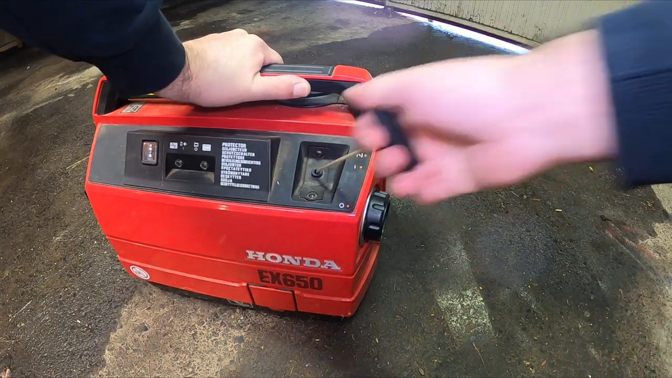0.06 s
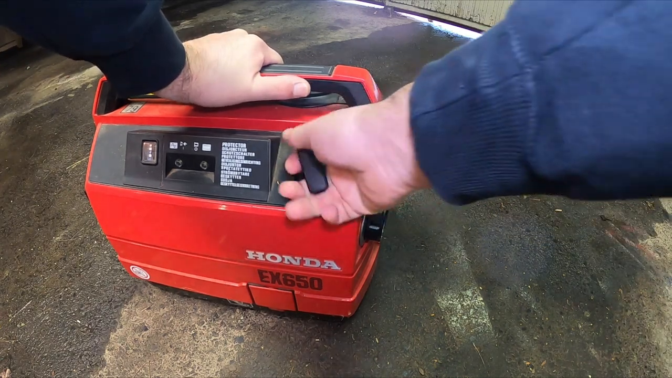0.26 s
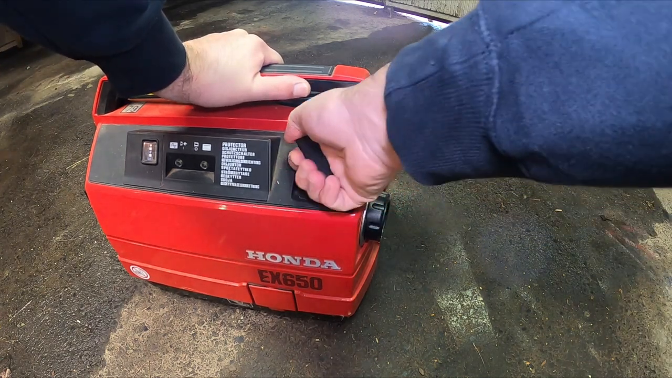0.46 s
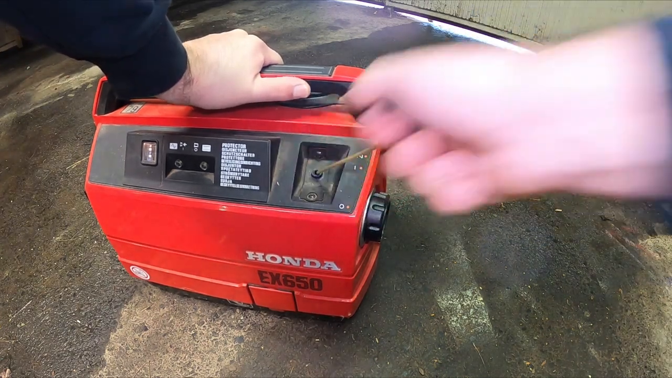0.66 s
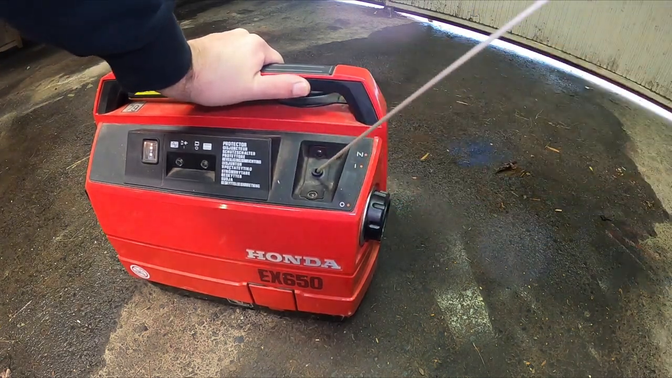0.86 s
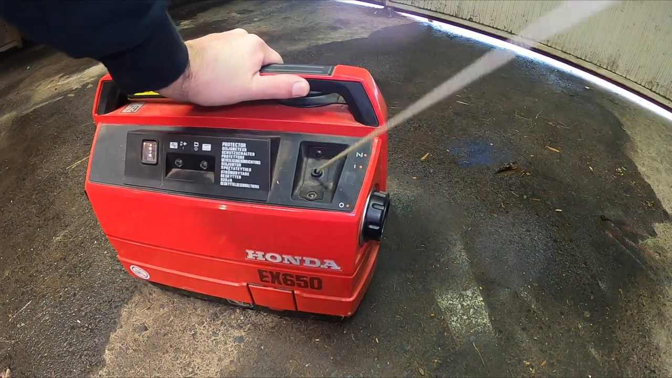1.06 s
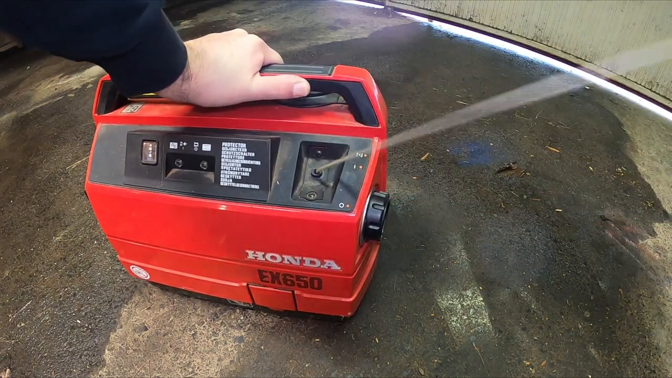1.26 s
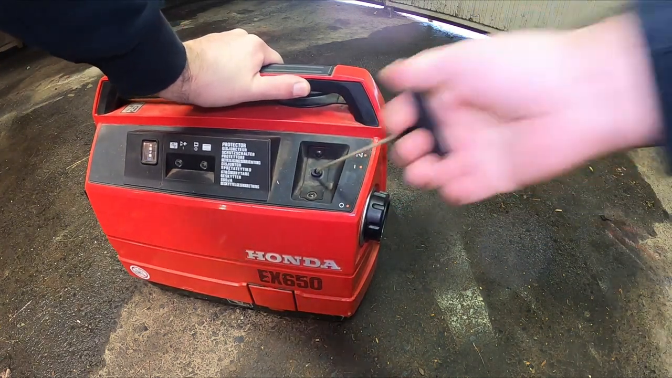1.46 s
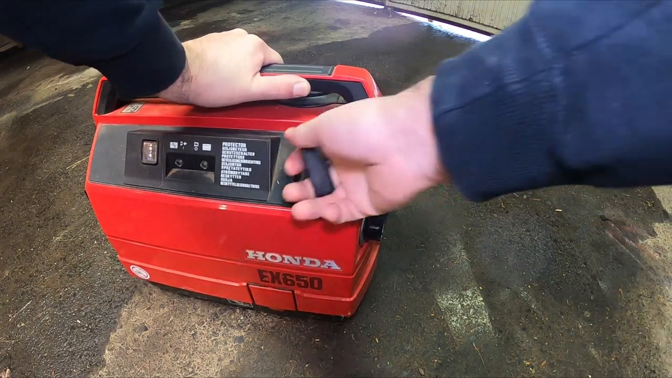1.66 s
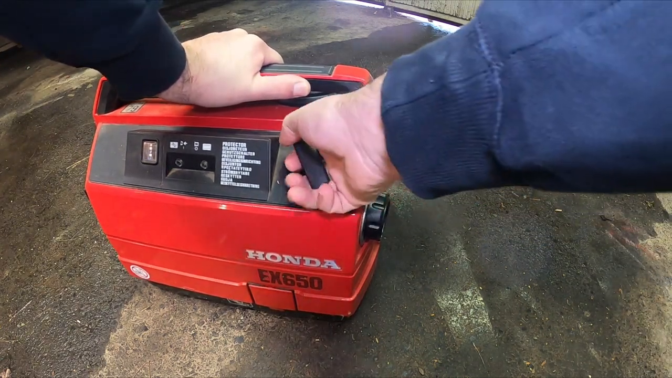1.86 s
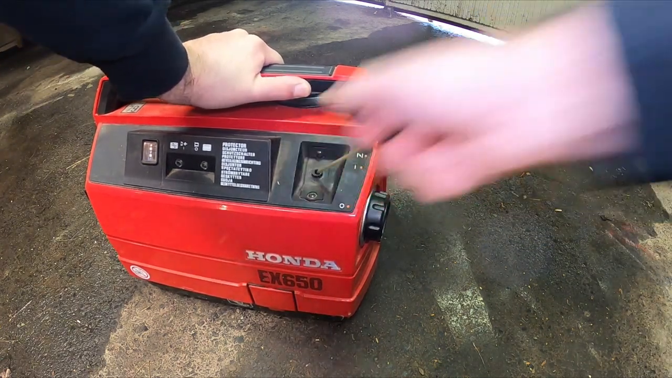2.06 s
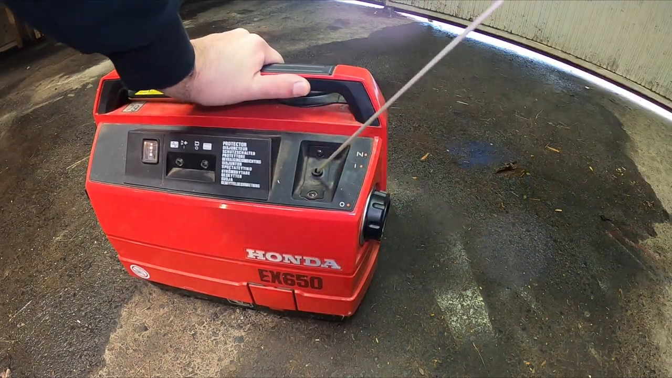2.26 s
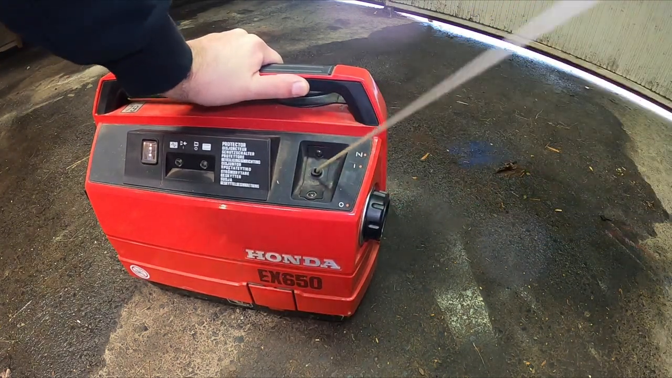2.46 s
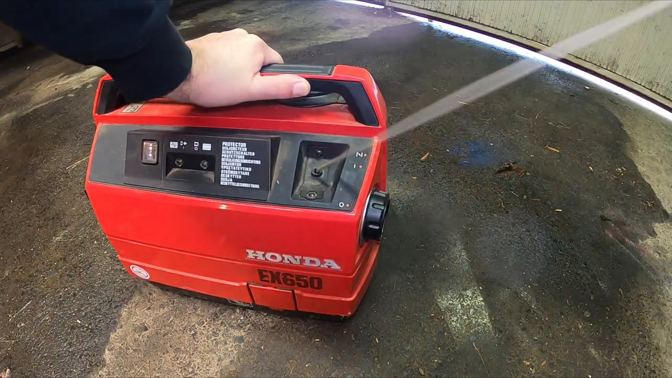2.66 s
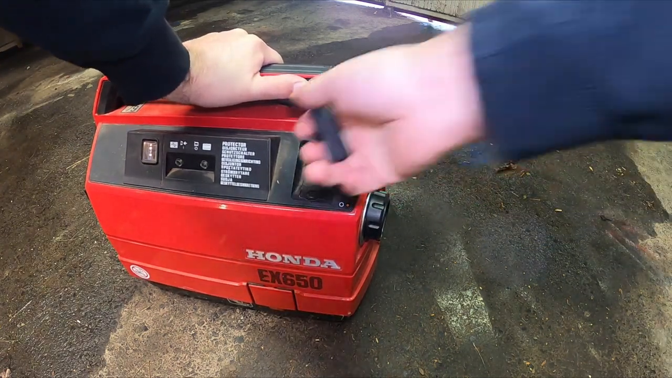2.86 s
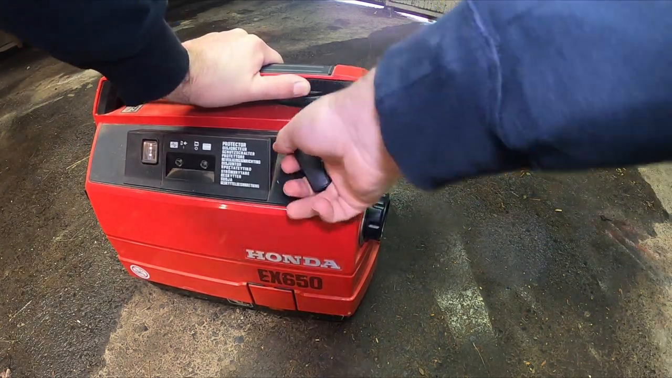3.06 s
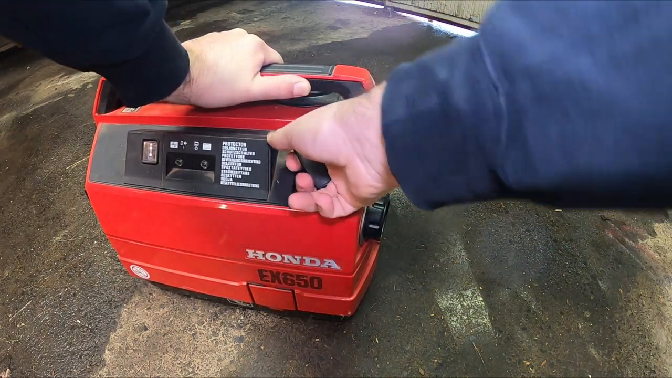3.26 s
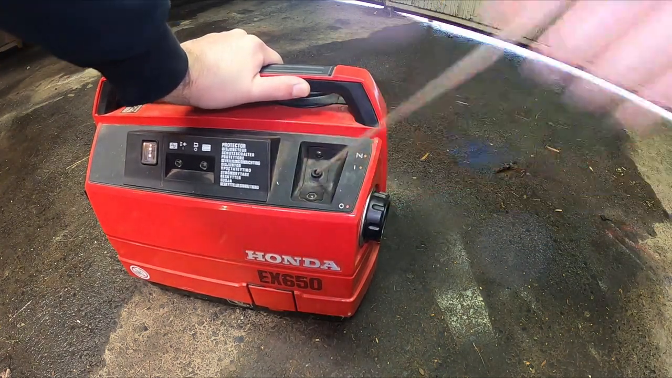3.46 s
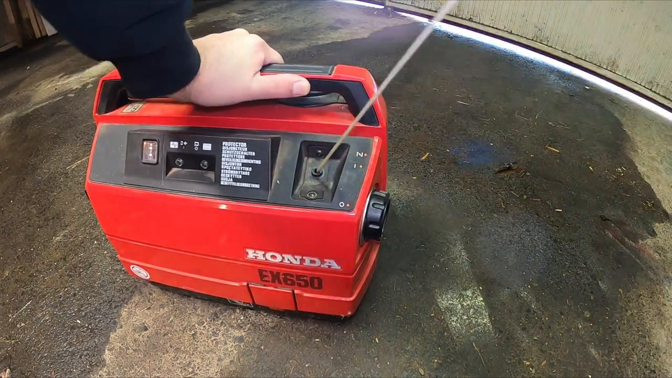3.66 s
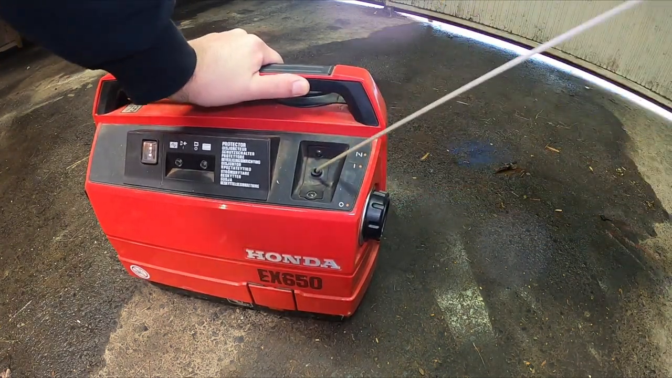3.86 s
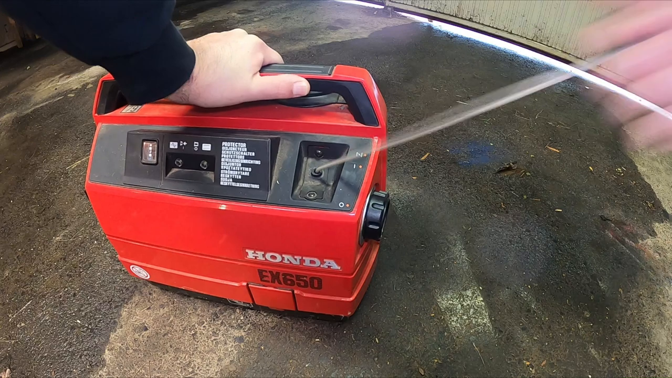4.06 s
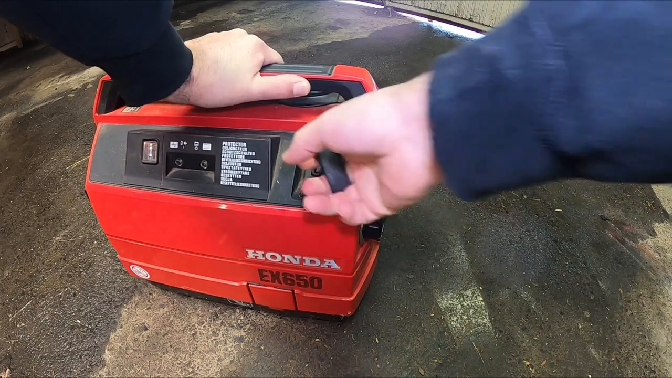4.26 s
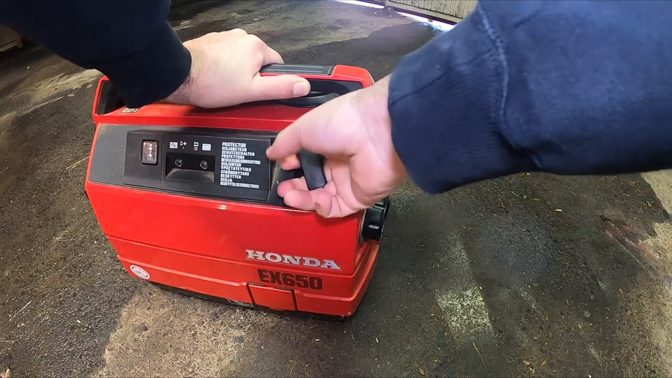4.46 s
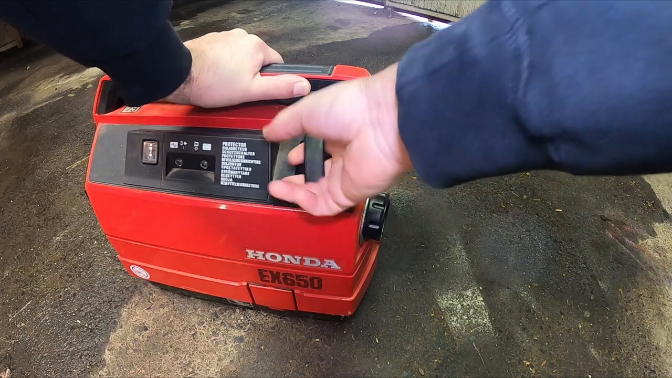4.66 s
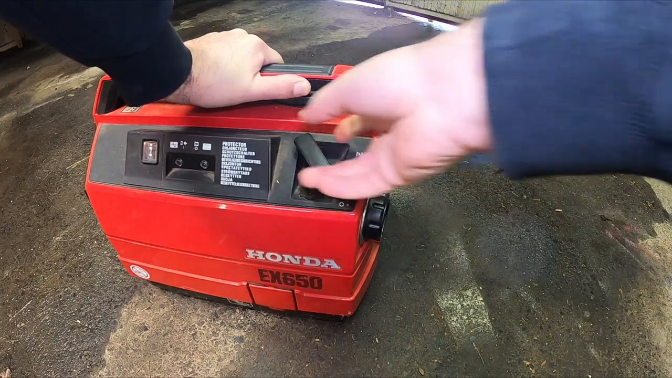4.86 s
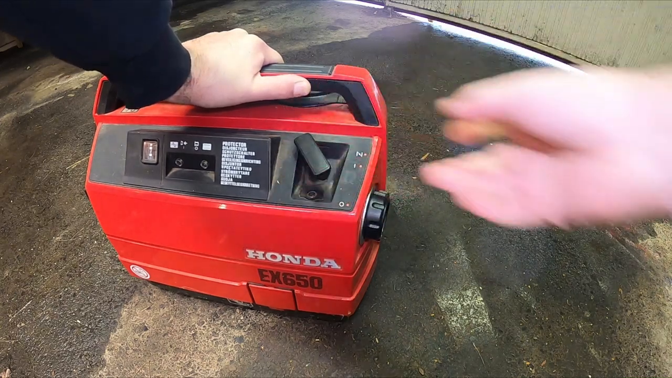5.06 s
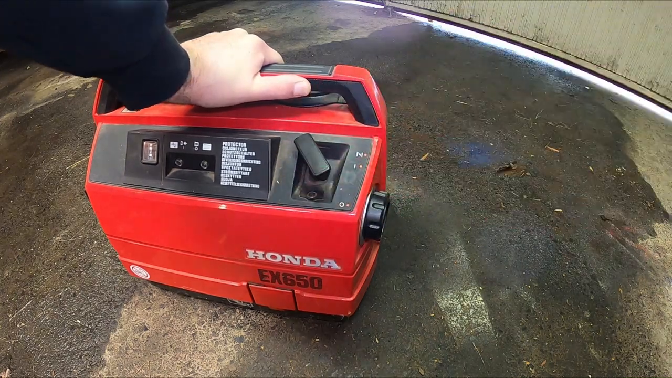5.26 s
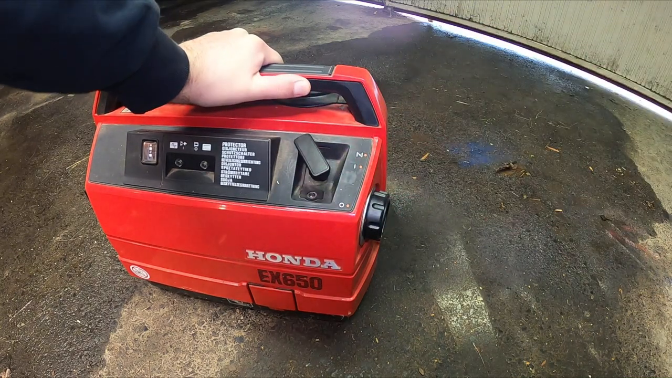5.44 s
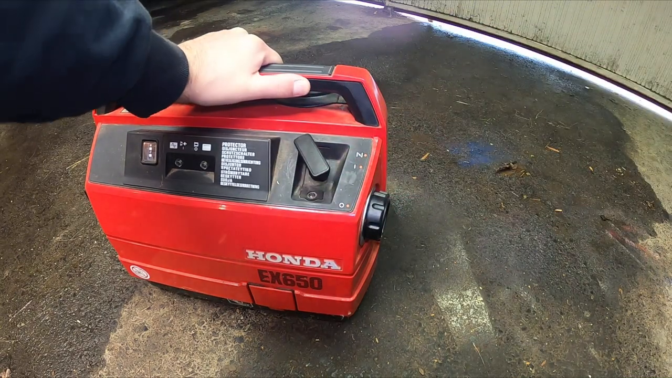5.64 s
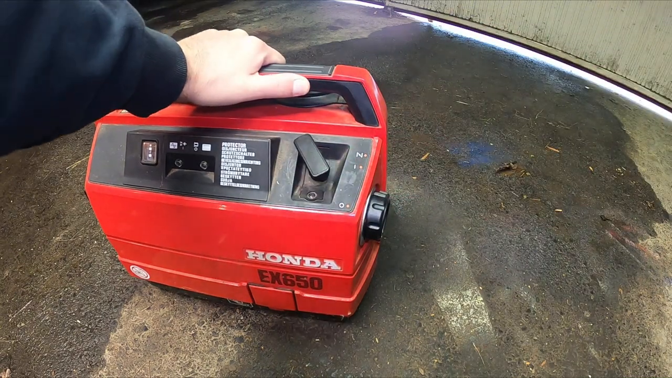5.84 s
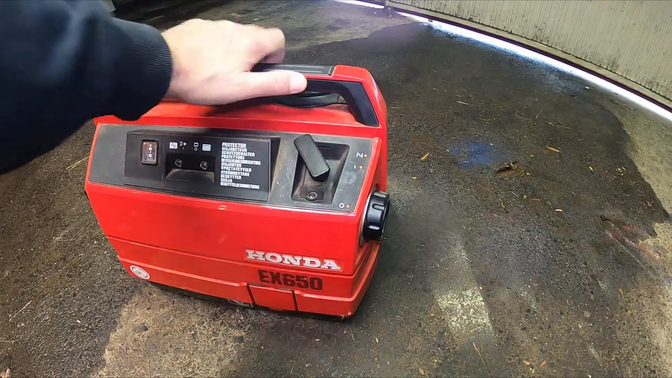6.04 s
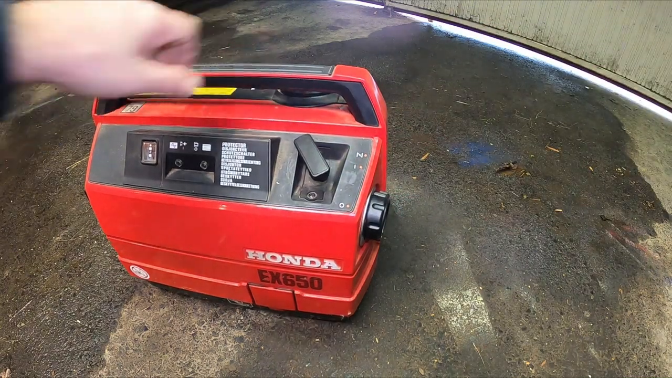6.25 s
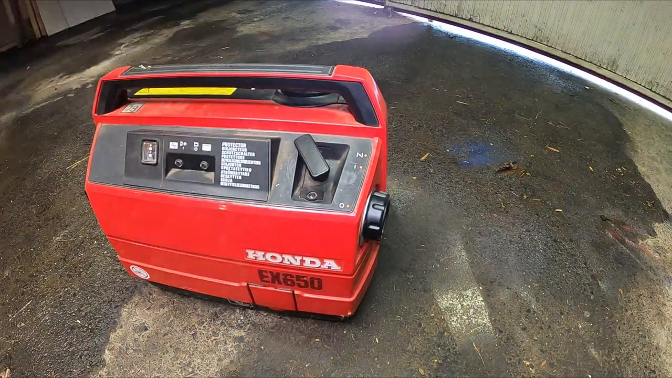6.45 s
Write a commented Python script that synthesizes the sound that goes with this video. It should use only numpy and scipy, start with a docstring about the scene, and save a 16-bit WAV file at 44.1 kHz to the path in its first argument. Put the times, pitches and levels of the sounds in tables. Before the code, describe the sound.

Close stereo in a concrete yard, with a very faint background wash and short hard reflections. It opens on a starter cord whirring back, a fading ring and small hand knocks near 0.4 s. At 0.77 s pawls clack and the cord zips upward to a rough 2.5 kHz squeal; at 1.14 s the cup pings with a beating ring, low puffs thud, and the rewind whine sinks away. A second pull runs 2.19 to 2.53 s, again dying out, with a knock at 3.1. The third, 3.56 to 3.87 s, leaves the engine turning with a brighter ring. Around 4.5 s it catches with low chugs and knocks, barking faster; the grip snaps home sharply at 4.96. It races into an even, buzzy drone by 5.2 to 5.7 s, then from 5.9 drops into a thumping, alternating lope with metallic clatter, still running at 6.5.

```python
"""A small petrol generator on a concrete yard is pulled over three times by its recoil cord and catches on the third.
Each pull: the pawls bite, the cord sings over its guide, the starter cup rings as the pawls let go, the reel winds back.
The four-stroke single then races up, runs evenly, and settles to a lope, firing hard on every second cycle.
Friction tones, filtered noise and decaying modes make the starter; tones locked to the cycles make the engine.
Two microphone ports hear the set directly and by its scatter off ground and wall."""
import sys
import numpy as np
from scipy import signal
from scipy.fft import rfft, irfft
from scipy.io import wavfile
from scipy.ndimage import map_coordinates

SR = 44100
rng = np.random.default_rng(int(sys.argv[2]) if len(sys.argv) > 2 else 0)


def store_wav(level_fs):
    """Save 16-bit WAV to argv[1]."""
    pcm = np.round(np.clip(np.atleast_2d(level_fs), -1, 1) * 32767)
    wavfile.write(sys.argv[1], SR, pcm.T.astype(np.int16))


N = 286797
TIME = np.arange(N) / SR

# pulls of the cord, the first already winding back as the scene opens: bite_s, release_s, swell_s, rewind_s,
# coast_db_per_s, rocking_dies_db_per_s, cup_db, cup_overtones_db
PULLS = [(-.65, -.27, .05, 1.02, 70, 32, -36, 0), (.773, 1.143, .05, .98, 58, 26, -17.3, 2.5),
         (2.188, 2.525, .042, .88, 38, 46, -18, -2.5), (3.559, 3.871, .012, 1.12, 8, 3, -17.3, 6.5)]
# spectrum of churned air and of the running engine's rumble: hz, relative_db
CHURN = [(35, -19.5), (60, -2.5), (110, 0.5), (180, -5.5), (260, -17.5), (500, -38.5)]

SWELL_DB_PER_S = 185  # rise of every pull
CATCH_S, LOPE_S = 4.5, 5.93  # the engine catches, then drops into its lope


def amp(db):
    """Decibels to gain."""
    return 10 ** (np.asarray(db) / 20)


def unit(x):
    """Scales to rms 1."""
    return x / np.sqrt(np.mean(x ** 2) + 1e-20)


def read(points, hz):
    """Reads a spectrum table on a log-frequency axis."""
    f, value = np.transpose(points)
    return np.interp(np.log(hz + 1), np.log(f + 1), value)


def follow(rows, t=TIME):
    """The columns of a curve table at the times t."""
    s, *columns = np.transpose(rows)
    return [np.interp(t, s, c) for c in columns]


def add(mix, s, sound):
    """Mixes a sound in at s seconds; what falls before zero is dropped."""
    at = round(s * SR)
    sound = sound[max(-at, 0):]
    part = mix[max(at, 0):][:len(sound)]
    part += sound[:len(part)]


def colour(x, points, size=4096):
    """Causal minimum-phase filter with the given spectrum, falling away steeply past its ends."""
    hz = abs(np.fft.fftfreq(size, 1 / SR)) + 1
    below = np.maximum(np.log2(points[0][0] / hz), 0)
    above = np.maximum(np.log2(hz / points[-1][0]), 0)
    db = read(points, hz) - 24 * (below + above)  # 24 dB an octave
    log_gain = np.log(amp(np.maximum(db, -100)))
    taps = np.fft.ifft(np.exp(np.conj(signal.hilbert(log_gain)))).real[:size // 2]
    return signal.oaconvolve(x, taps / np.linalg.norm(taps))[:len(x)]


def drift(rate, size=N):
    """Smooth chance of rms near 1, changing about rate times a second."""
    knots = rng.standard_normal(4096)
    return map_coordinates(knots, [np.arange(size) * rate / SR], order=2, mode="wrap")


def resonate(x, hz, width):
    """One resonance of gain 1, its width in Hz."""
    r = np.exp(-np.pi * width / SR)
    return 2 * signal.lfilter([1 - r], [1, -r * np.exp(2j * np.pi * hz / SR)], x).real


def ring(hz, t60, rise):
    """A mode that swells over rise seconds and dies by 60 dB in t60 seconds."""
    t = TIME[:2 * SR]
    return np.sin(2 * np.pi * hz * t) * np.exp(-np.log(1000) * t / t60) * (1 - np.exp(-t / rise))


def grit(per_s, spread_db, smooth):
    """Many small impacts of uneven size over smooth noise."""
    sizes = amp(spread_db * np.minimum(rng.exponential(1, N), 4)) * rng.choice([-1, 1], N)
    impacts = unit(sizes * (rng.random(N) < per_s / SR))
    return unit(impacts + smooth * rng.standard_normal(N))


def panels(x, ring_db):
    """The case adds its panel resonances to whatever shakes it."""
    # case panels: hz, width_hz, relative_db
    panel_modes = [(348, 13, -6.3), (461, 18.5, -11), (659.6, 37, -3.5), (891, 21, -10), (1141, 13, -17),
                   (1315, 24, -10), (1780, 21, -17.5)]
    rung = sum(amp(db) * resonate(x, hz, width) for hz, width, db in panel_modes)
    return unit(unit(x) + amp(ring_db) * unit(rung))


def sing(hz, waver, flutter):
    """A rough friction tone on a pitch curve, wavering in pitch and fluttering in strength."""
    turns = np.cumsum(hz * (1 + waver * drift(423.5, size=len(hz)))) / SR
    strength = np.maximum(1 + flutter * drift(171.8, size=len(hz)), 0)
    return unit(strength * np.sin(2 * np.pi * turns)) * signal.windows.tukey(len(hz), .05)


def tug(t):
    """The arm's hardest effort, 0-1, t seconds after the pull has swelled."""
    lag_s, width_s = .04, .07
    return np.exp(-((t - lag_s) / width_s) ** 2)


def reel_gain(slack_db, pull_db, tug_db, rewind_db, fall_db):
    """Each pull swells and holds; its rewind is softer and dies ever faster."""
    gain = np.zeros(N)
    for bite, release, swell_s, rewind_s, *_ in PULLS:
        t, since = TIME - bite - swell_s, TIME - release
        swell_db = SWELL_DB_PER_S * np.minimum(t, 0)
        slack = slack_db * (TIME < bite)  # before the bite only slack is taken up
        pulling = pull_db + tug_db * tug(t) + swell_db + slack
        rewinding = rewind_db - fall_db * (since / rewind_s) ** 2
        gain += amp(np.where(since < 0, pulling, rewinding))
    return gain


def crank_gain():
    """The dead engine spins up under each pull, then coasts down; all this fades after the catch."""
    # it turns fastest as the pawls let go, then settles into coasting
    spin_db, spin_up_db_per_s, coast_db, settle_s = -21.5, 72, -27.5, .045
    gain = np.zeros(N)
    for bite, release, _, _, coast_db_per_s, *_ in PULLS:
        since = TIME - release
        rising = spin_db + spin_up_db_per_s * since + SWELL_DB_PER_S * np.minimum(TIME - bite, 0)
        settling = (spin_db - coast_db) * np.exp(-abs(since) / settle_s)
        coasting = coast_db + settling - coast_db_per_s * since
        gain += amp(np.where(since < 0, rising, coasting))
    return gain * np.exp(-np.maximum(TIME - CATCH_S, 0) / .4)


def brush_gain():
    """Soft swells where a hand shifts on the case, brushing and rocking it."""
    # hand on the case: centre_s, half_length_s, relative_db
    brushes = [(.56, .2, -59), (1.83, .08, -56), (3.38, .02, -69)]
    return sum(amp(db) * np.exp(-((TIME - s) / length) ** 2) for s, length, db in brushes)


def starter():
    """The reel rattles in the case, the cord hisses, and the dead engine churns air: three filtered noises."""
    # spectra of reel and cord: hz, relative_db
    rattle_tone = [(120, -26), (220, -2.5), (330, -4), (450, 1.5), (590, -12), (740, -4.5), (950, 3.5),
                   (1350, -1.5), (1800, -1.5), (2600, -7), (4000, -36.5)]
    hiss_tone = [(1000, -30), (1300, -9), (1700, -10), (2200, -0.5), (3100, 3.5), (3800, -.3),
                 (4450, -13.5), (5700, -14), (6800, -20), (7900, -20), (9000, -29.5), (10400, -29.5),
                 (11300, -37), (12500, -33.5), (14500, -42)]
    # levels of reel and cord: slack_db, pull_db, tug_extra_db, rewind_db, rewind_fall_db
    rattle_levels = (-6, -29.3, 4.5, -34, 52)
    hiss_levels = (-3, -30.8, .5, -33.8, 47)
    rattle = panels(colour(grit(1500, 3, 0.98), rattle_tone), ring_db=-6) * amp(1.35 * drift(60))
    hiss = colour(grit(1800, 2.0, 0.89), hiss_tone) * amp(0.72 * drift(90))
    churn = colour(grit(90, 3.36, 0.68), CHURN)
    hiss_gain = np.hypot(reel_gain(*hiss_levels), brush_gain())
    return rattle * reel_gain(*rattle_levels) + hiss * hiss_gain + churn * crank_gain()


def cord():
    """The braid sings over its guide on the way out, at a pitch set by its speed, and the reel rasps below."""
    # speed of the cord, one curve a pull: time_s, pitch_hz
    speeds = [
        [(.785, 420), (.82, 612), (.88, 1400), (.905, 1680), (.935, 1620), (.995, 2520), (1.045, 2520),
         (1.14, 2280)],
        [(2.2, 436), (2.225, 643), (2.27, 1478), (2.325, 2150), (2.348, 1800), (2.38, 2517), (2.447, 2720),
         (2.465, 2370), (2.52, 2520)],
        [(3.575, 714), (3.628, 1620), (3.648, 1473), (3.675, 2200), (3.728, 2566), (3.765, 2473), (3.8, 2610),
         (3.865, 2430)],
    ]
    # overtones of the reel: multiple_of_reel_pitch, relative_db
    rasp_parts = [(.5, -14.5), (1, -4.5), (2, -11), (3, -9), (4, -7.5), (5, -13)]
    pull_db, tug_db, tires_db_per_s = -25.3, .5, 6
    out = np.zeros(N)
    for rows, (bite, _, swell_s, *_) in zip(speeds, PULLS[1:]):
        start = rows[0][0]
        s = np.arange(start, rows[-1][0], 1 / SR)
        hz, t = follow(rows, s)[0], s - bite - swell_s
        db = pull_db + tug_db * tug(t) - tires_db_per_s * t + SWELL_DB_PER_S * np.minimum(t, 0)
        tone = sing(hz, waver=0.019, flutter=0.7)
        # an upper strand strengthens with speed until the steep roll-off
        upper = amp(-2 + 11 * np.log2(hz / 2500)) * sing(1.52 * hz, waver=0.0093, flutter=0.86)
        upper = upper / (1 + (hz / 2750) ** 24)
        # the case shuts the reel's overtones in near 4 kHz
        reel_hz = .56 * hz
        reel = 0
        for k, part_db in rasp_parts:
            shut_in = 1 + (k * reel_hz / 3800) ** 20
            reel = reel + amp(part_db) * sing(k * reel_hz, waver=0.018, flutter=0.46) / shut_in
        add(out, start, amp(db) * (tone + upper + reel))
    return out


def rewind():
    """The spring whips the cord back, then it slows: a whine of strands that rises, then sinks and fades."""
    # cord going home: fastest_s, top_pitch_hz, level_db, spin_up_s, slowing_s
    rewinds = [(-.06, 2300, -38, .2, .15), (1.295, 2300, -32.5, .17, .11), (2.71, 2150, -35.5, .4, .25),
               (4.035, 2280, -34.5, .23, .25)]
    # strands of the whine: multiple_of_cord_pitch, relative_db
    strands = [(.33, -12), (.46, -8), (.58, -8), (.69, -6), (.85, -10), (1, 0), (1.6, -1)]
    lead_s, length_s, fade_db_per_s = .07, .5, 70
    out = np.zeros(N)
    for fastest, top_hz, db, spin_up_s, slowing_s in rewinds:
        t = np.arange(max(-lead_s, -fastest), length_s, 1 / SR)
        before, after = np.maximum(-t, 0), np.maximum(t, 0)
        hz = top_hz * (1 - before / spin_up_s) / np.sqrt(1 + after / slowing_s)
        gain = amp(db - fade_db_per_s * after) * (1 - (before / lead_s) ** 2)
        whine = sum(amp(part_db) * sing(k * hz, waver=.013, flutter=.55) for k, part_db in strands)
        add(out, fastest + t[0], gain * whine)
    return out


def cup():
    """The steel starter cup rings as the pawls let go; its close pair of modes beats."""
    # cup modes: hz, relative_db, t60_s
    cup_modes = [(2448, -.5, .95), (2504, -1, .97), (2690, -15, 0.5), (5046, -20.5, 0.9),
                 (5100, -23.5, 0.71), (5320, -23, 0.6), (5379, -22, .7), (5450, -27, .35),
                 (5840, -30, 0.92), (7550, -46, .5), (10400, -52, .5), (12450, -43, .3)]
    out = np.zeros(N)
    for _, release, *_, db, overtones_db in PULLS:
        for hz, mode_db, t60 in cup_modes:
            overtone = hz > 2 * cup_modes[0][0]
            mode = ring(hz, t60, rise=.002)
            add(out, release, amp(db + mode_db + overtones_db * overtone) * mode)
    # the cup spins and the pawls keep brushing it, so its ring wavers in pitch and strength
    spun = np.arange(N) + 1.6 * drift(110)
    return map_coordinates(out, [spun], order=3) * amp(2.2 * drift(90) + 0.5)


def knocks():
    """Short blows of pawls, grip, cord and the catching engine: each a mode with a soft and a bright noise burst."""
    # knocks of grip and cord on the case, and of the engine as it catches:
    # time_s, body_relative_db, edge_relative_db, t60_s, ring_hz
    blows = [(0.394, -48, -51, 0.16, 1344), (0.446, -48, -61, 0.11, 224), (1.79, -46, -50, 0.12, 200),
             (2.145, -28, -17, 0.012, 3330), (3.107, -35, -41, 0.06, 952), (3.113, -45, -62, .2, 205),
             (3.51, -36.5, -42, 0.11, 1365), (4.51, -32, -41, 0.024, 980), (4.602, -24, -35, .025, 1050),
             (4.695, -25, -37, .02, 900), (4.763, -22, -39, 0.013, 1500), (4.942, -18, -28, 0.03, 1980),
             (4.957, -17, -27, 0.016, 1900)]
    # pawls, alike on every pull: body_relative_db, edge_relative_db, t60_s, ring_hz
    bite_blow = (-19.5, -24, .075, 1330)
    release_blow = (-24.5, -20, .085, 2640)
    # spectra of the two bursts: hz, relative_db
    body_tone = [(130, -3.5), (280, -3), (700, -2), (1000, 0.5), (1350, 0), (1900, -10), (2800, -24.5)]
    edge_tone = [(1400, -10), (2400, 3.5), (3400, 3), (4400, -15), (5300, -6), (6500, -13.5), (8000, -12),
                 (10000, -28.5), (13500, -31), (15000, -35)]
    body, edge, rings, t = np.zeros(N), np.zeros(N), np.zeros(N), TIME[:SR // 4]
    bites = [(bite, *bite_blow) for bite, *_ in PULLS]
    releases = [(release, *release_blow) for _, release, *_ in PULLS]
    for s, body_db, edge_db, t60, hz in bites + releases + list(blows):
        add(rings, s, amp(body_db + 3.5) * ring(hz, t60, rise=0.00045))
        fade = np.exp(-np.log(1000) * t / t60)
        add(body, s, amp(body_db) * fade * rng.standard_normal(len(t)))
        add(edge, s, amp(edge_db) * fade * rng.standard_normal(len(t)))
    return colour(body, body_tone) + colour(edge, edge_tone) + rings


def grip_home():
    """The released grip snaps into its socket, ringing a few very short modes."""
    # grip modes: hz, level_db, t60_s
    grip_modes = [(1250, -13, .01), (1950, -10, .01), (2550, -10.5, .009), (3400, -18, .007),
                  (5000, -25, .006)]
    out = np.zeros(N)
    for hz, db, t60 in grip_modes:
        add(out, 4.9582, amp(db) * ring(hz, t60, rise=.00006))
    return out


def compression():
    """Each compression stroke gives a pair of soft low puffs, both the same damped mode."""
    # strokes: main_puff_s, main_relative_db, earlier_relative_db
    strokes = [(1.04, -14.5, -22), (1.154, -12, -12), (2.444, -17, -14), (2.552, -12.5, -15),
               (3.758, -11.5, -25), (3.869, -15, -26), (4.462, -18, -28), (4.575, -9.5, -26)]
    gap_s = .033
    out = np.zeros(N)
    puff = amp(3) * ring(124.6, 0.051, rise=0.0037)
    for s, main_db, early_db in strokes:
        add(out, s, amp(main_db) * puff)
        add(out, s - gap_s, amp(early_db) * puff)
    return out


def firings(cycles):
    """Hard firings thump the silencer's modes; every exhaust valve opening gives an impulse for the bark."""
    # modes of a hard firing: delay_s, hz, t60_s, relative_db
    firing_modes = [(0, 205, 0.056, -2), (.003, 263, 0.037, -14.5), (.012, 68.3, 0.066, -4.5),
                    (.016, 136, 0.056, 2), (.049, 92, .1, -2), (.068, 120.6, 0.1, -2)]
    # bark of the exhaust, hardest while racing up: time_s, relative_db
    bark_levels = [(4.52, -7), (4.75, 5), (4.85, 1), (5.05, -1.5)]
    starts = np.flatnonzero(np.diff(np.floor(cycles)) > 0)
    # at idle the governor starves every second cycle
    fired = (TIME[starts] < LOPE_S) | (np.arange(len(starts)) % 2 == 0)
    chances = rng.standard_normal((len(starts), len(firing_modes) + 1))
    thumps, valve = np.zeros(N), np.zeros(N)
    for at, hard, chance in zip(starts, fired, chances):
        s = at / SR
        valve[at] = amp(.6 * chance[-1] + follow(bark_levels, s)[0] - 8 * (not hard))
        for (delay, hz, t60, db), luck in zip(firing_modes, chance):
            mode = ring(hz * (1 + .006 * luck), t60, rise=0.0085)
            add(thumps, s + delay - .013, hard * amp(db + .5 * luck) * mode)
    return thumps / thumps[starts[0]:].std(), valve


def exhaust(thumps, cycles, even):
    """Even running is a stack of low orders of the cycle; uneven running is thumps; a rumble lies under both."""
    # orders: multiple_of_cycle_rate, relative_db
    orders_even = [(1, -19), (2, -17.5), (3, -8), (4, -23), (5, 4), (6, -7), (7, -24), (8, -5.5), (9, -21),
                   (10, -18), (11, -35), (12, -22.5)]
    orders = sum(amp(db + .4 * drift(8)) * np.cos(2 * np.pi * k * (cycles - .26)) for k, db in orders_even)
    rumble = colour(rng.standard_normal(N), CHURN)
    return np.sqrt(1 - even) * thumps + np.sqrt(even) * unit(orders) + amp(-20) * rumble


def clatter(cycles, even):
    """The valve gear clatters through the case panels, swelling as each charge burns."""
    # spectrum of the clatter: hz, relative_db
    clatter_tone = [(260, -0.5), (340, -5), (480, -2.5), (650, -6.5), (820, -9), (930, -9.5), (1400, -10),
                    (2200, -15), (3000, -15.5), (3800, -22.5), (4400, -34.5), (7600, -40), (10000, -54.5),
                    (13500, -59.5)]
    each_cycle = 0.75 * np.cos(2 * np.pi * (cycles + 0.043))
    every_second = 0.77 * (1 - even) * np.cos(np.pi * (cycles + 0.14))
    return panels(colour(grit(1400, 2.6, 1.0), clatter_tone), ring_db=-15.5) * amp(each_cycle + every_second)


def engine():
    """The running four-stroke: exhaust, shaking crank, clatter and bark, all locked to one count of cycles."""
    # engine speed: time_s, cycles_per_s
    cycle_rate = [(4.5, 7.57), (4.66, 13.3), (4.8, 17.27), (4.95, 20.09), (5.15, 22.62), (5.35, 23.62),
                  (5.55, 22.56), (5.8, 22.21), (6.05, 21.23), (6.25, 21.01), (6.5, 21.62)]
    # running levels: time_s, exhaust_relative_db, clatter_relative_db
    running = [(4.4, -22, -41), (4.54, -28, -38), (4.63, -16.5, -34), (4.8, -19, -33), (4.98, -19.5, -33.5),
               (5.09, -27, -30.5), (5.17, -21.5, -34), (5.33, -17.5, -33), (5.47, -22, -35),
               (5.6, -21.5, -33), (5.7, -26.5, -36.5), (5.9, -24.5, -33), (5.99, -18, -34),
               (6.5, -17.5, -33)]
    # share of even running: time_s, share_0_to_1
    evenness = [(4.4, 0.05), (5.0, 0.17), (5.2, 0.91), (5.65, 0.74), (5.88, 0.1), (5.98, 0.06), (6.5, 0)]
    # spectrum as the exhaust valve opens: hz, relative_db
    bark_tone = [(250, -17), (380, -8.5), (490, 4.5), (650, -0.5), (800, -14), (1300, -16.5)]
    exhaust_db, clatter_db = follow(running)
    even = np.clip(follow(evenness)[0], 0, 1)
    alive = np.clip((TIME - 4.42) / 0.09, 0, 1)
    cycles = np.cumsum(follow(cycle_rate)[0] * (TIME >= CATCH_S)) / SR - .23
    thumps, valve = firings(cycles)
    blast = exhaust(thumps, cycles, even) * amp(exhaust_db + .5)
    # the unbalanced crank shakes the set once a turn, and slower when firing is uneven
    shake = amp(-27.5) * np.cos(4 * np.pi * (cycles - .26))
    shake = shake + amp(-31) * (1 - even) * np.cos(3 * np.pi * cycles)
    bark = colour(np.roll(valve, -SR // 1000), bark_tone) * amp(-2.7)
    gear = clatter(cycles, even) * amp(clatter_db + 2.6)
    return alive * (blast + shake + gear) + bark


def rocking():
    """The generator rocks on its rubber feet, most as the pawls let go: noise through a resonance at 36 Hz."""
    peak_db, rise_db_per_s, brush_db = -35, 44, 7
    gain = np.zeros(N)
    for bite, release, _, _, _, dies_db_per_s, *_ in PULLS:
        since = TIME - release
        slope = np.where(since < 0, rise_db_per_s, -dies_db_per_s)
        gain += amp(peak_db + slope * since + SWELL_DB_PER_S * np.minimum(TIME - bite, 0))
    sway = unit(resonate(resonate(rng.standard_normal(N), 36, 18), 36, 18))
    return sway * np.hypot(gain, amp(brush_db) * brush_gain())


def yard():
    """The faint steady wash of the yard: coloured noise."""
    # spectrum of the open yard: hz, relative_db
    yard_tone = [(30, -1), (100, -18), (215, 1), (400, -18), (700, -36), (1300, -13.5), (2500, -24),
                 (3700, -26.5), (4800, -40), (5600, -38), (6000, -22), (6500, -37), (7500, -38),
                 (10000, -64), (14000, -78)]
    return amp(-59) * colour(rng.standard_normal(N), yard_tone)


def scene():
    """Two microphone ports hear the set directly, and its scatter off ground and wall with opposite sign."""
    # likeness of the two ports: hz, likeness_0_to_1
    likeness = [(120, .996), (250, .975), (500, .94), (1000, .91), (2400, .95), (4000, .88), (8000, .8),
                (14000, .85)]
    # balance of the ports: hz, left_minus_right_db
    lean = [(100, .5), (760, -.5), (1770, 1.5), (2500, 4), (3600, 1), (5200, -3), (6500, -8), (9000, -15),
            (12000, -5), (15000, -4)]
    # phase between the ports: hz, left_leads_rad
    lead = [(0, 0), (2580, -.9), (4130, -2), (5860, -2.6), (7320, -3), (11800, -5.2), (14500, -7)]
    pulled = starter() + cord() + rewind() + cup() + knocks() + grip_home() + compression()
    direct = rfft(pulled + engine() + rocking() + yard())
    t = TIME[:SR // 4]
    taps = rng.standard_normal(len(t)) * np.exp(-np.log(1000) * t / .18)  # scatter dies by 60 dB in 0.18 s
    scatter = direct * rfft(taps / np.linalg.norm(taps), N)
    bins = np.fft.rfftfreq(N, 1 / SR)
    same = np.clip(read(likeness, bins), 0, 1)
    near, far = np.sqrt((1 + same) / 2), np.sqrt((1 - same) / 2)
    left = amp(read(lean, bins) / 2) * np.exp(.5j * np.interp(bins, *np.transpose(lead)))
    right = 1 / left
    # dividing by this keeps the level of the two ports' sum
    centre = np.hypot(near * abs(left + right), far * abs(left - right)) / 2
    ports = [left * (near * direct + far * scatter), right * (near * direct - far * scatter)]
    return irfft(np.array(ports) / centre, N)


def record(dry):
    """The recorder's band limit: a steep low-pass at 14950 Hz."""
    low_pass = signal.firwin(511, 14950, window=("kaiser", 9), fs=SR)
    return signal.oaconvolve(dry, low_pass[None], "same")


dry = scene()
out = record(dry)
store_wav(out)
```